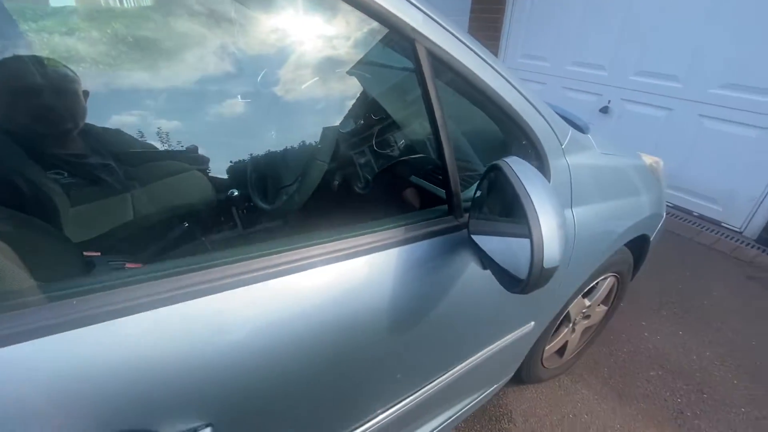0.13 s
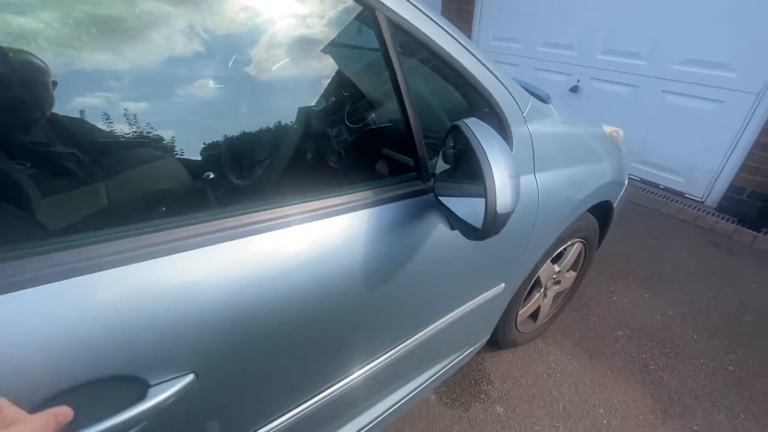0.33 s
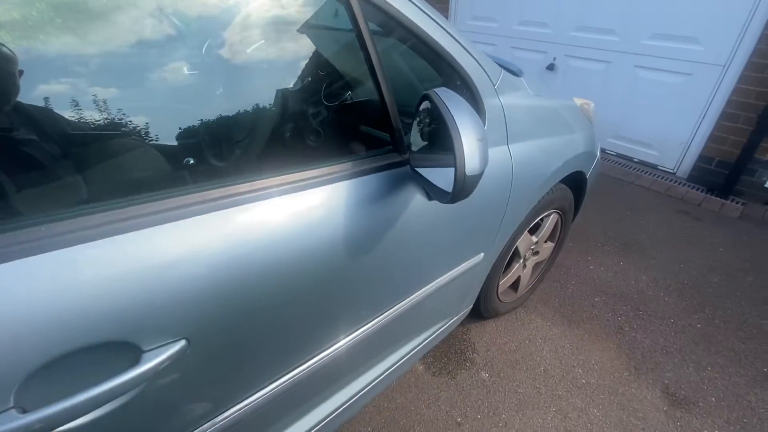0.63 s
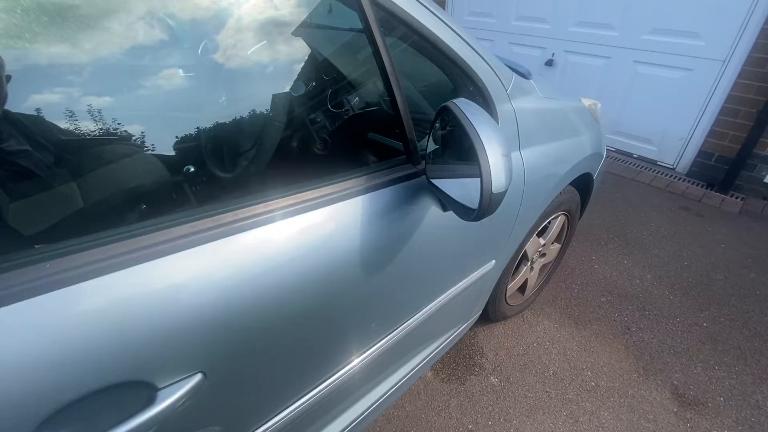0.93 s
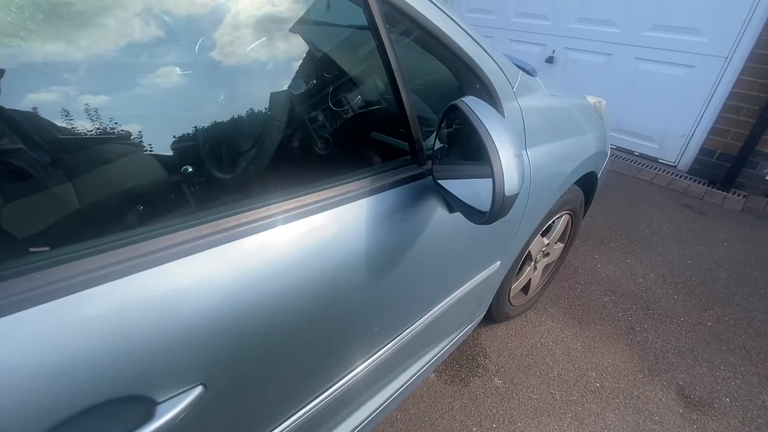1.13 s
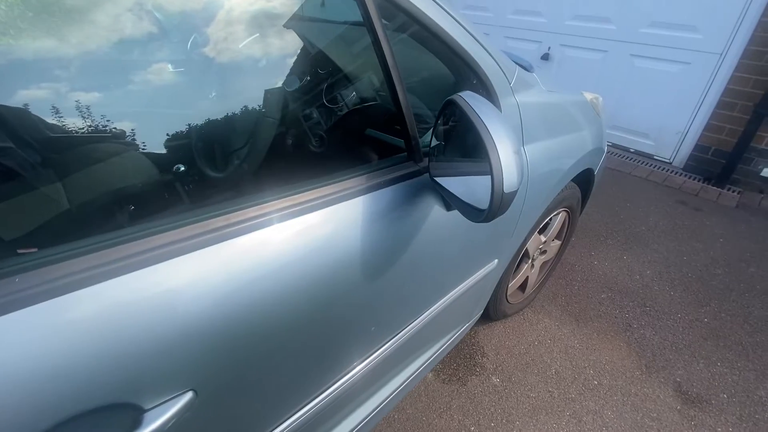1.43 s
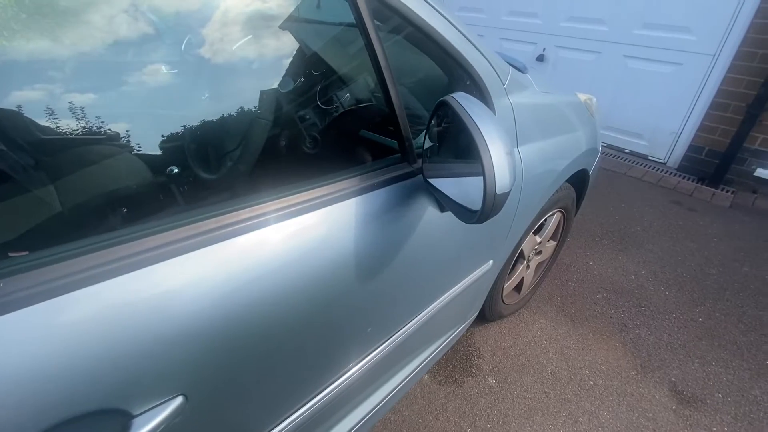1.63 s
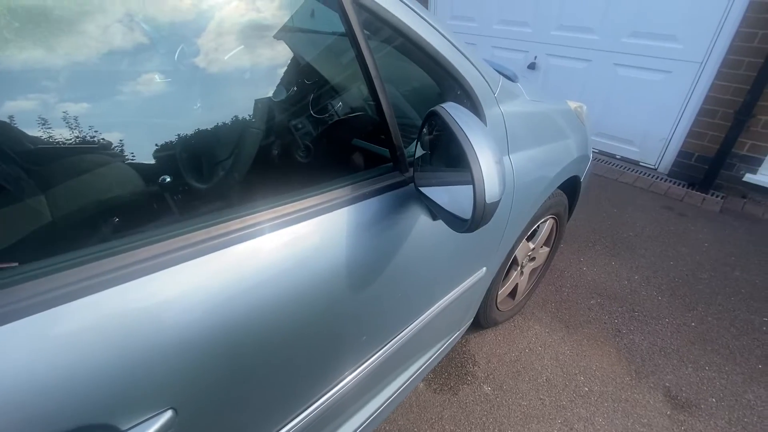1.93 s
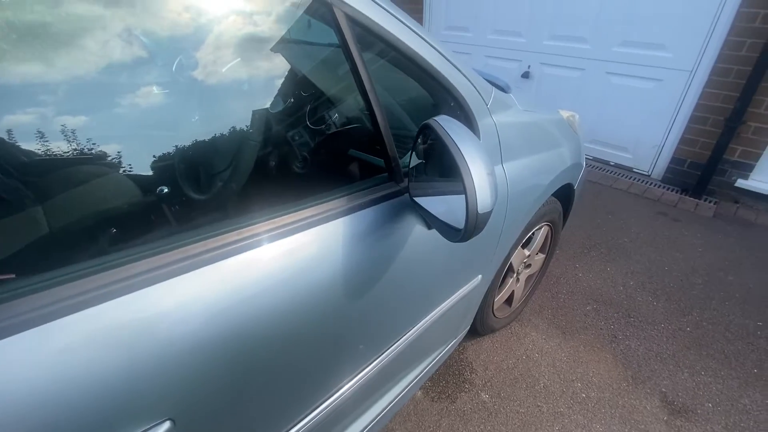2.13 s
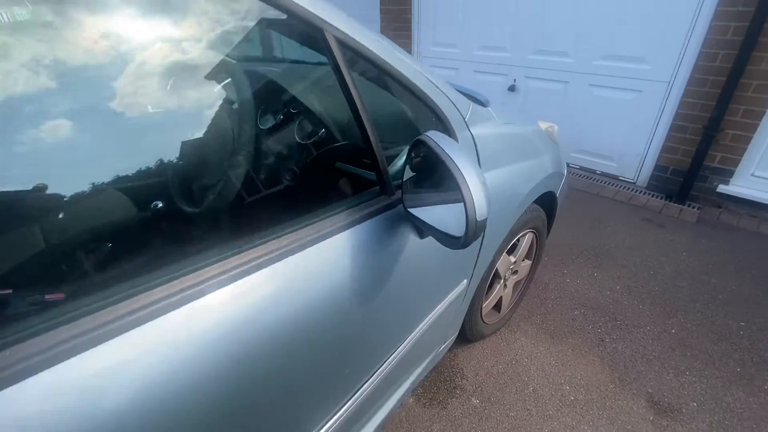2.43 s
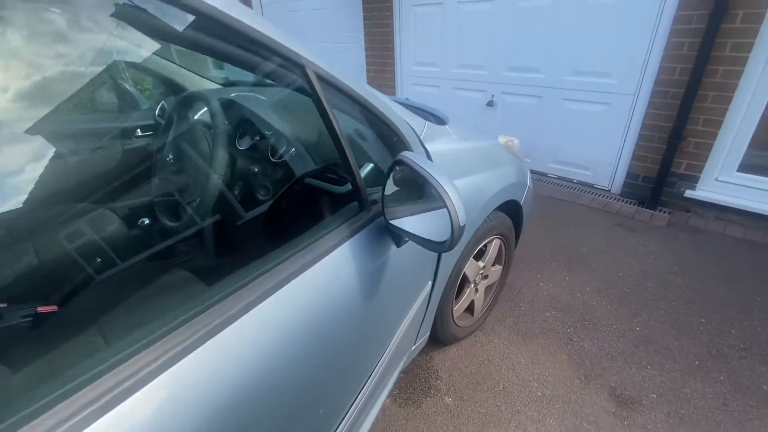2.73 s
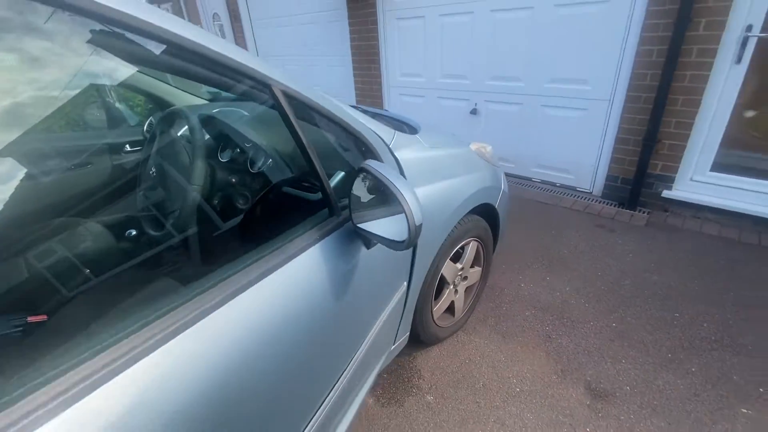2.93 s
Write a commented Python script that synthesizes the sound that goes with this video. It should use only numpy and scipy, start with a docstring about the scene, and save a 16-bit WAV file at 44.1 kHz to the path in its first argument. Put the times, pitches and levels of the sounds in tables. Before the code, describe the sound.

A car door, heard close in stereo outdoors: a sharp lock clunk with a hollow low boom at 0.2 s, then sparse ticks. A softer double knock comes at 1.2 s, faint clicks and a tiny rising squeak around 1.4 s. The latch thuds at 2.2 s, a dry hinge creaks at 2.3-2.5 s, hard clacks follow at 2.6-2.8 s, bright ticks near 3 s. Soft wind buffets and faint traffic underneath.

```python
"""Lock and latch knock a car door on a driveway: bursts of blows excite decaying modes and skin noise.
Booms of band-passed noise follow some knocks, and small parts tick as short, partly resonant noise bursts.
A hand rubs the handle (grit and hiss), a faint tone slides up and a dry hinge creaks by stick-slip pulses.
Wind puffs (low-passed noise) and far traffic (coloured noise) lie under it, all heard by two close ports."""
import sys
import numpy as np
from scipy import signal
from scipy.fft import rfft, irfft, next_fast_len
from scipy.io import wavfile
from scipy.ndimage import uniform_filter1d

SR = 44100
rng = np.random.default_rng(int(sys.argv[2]) if len(sys.argv) > 2 else 0)


def waveform_to_disk(signal):
    """Save audio, clipped to [-1, 1], as 16-bit WAV at the path in sys.argv[1]."""
    frames = np.transpose(np.atleast_2d(signal))
    scaled = np.clip(frames, -1, 1) * 32767
    samples = np.round(scaled).astype(np.int16)
    wavfile.write(sys.argv[1], SR, samples)


def natural_amplitude(level_db):
    """Convert a level in decibels to a linear amplitude factor, elementwise."""
    exponent = np.asarray(level_db, float) / 20
    return 10 ** exponent


N = 136710  # length in samples
TIME_S = np.arange(N) / SR
LEAD = 512  # samples of small blows before the main blow of a knock


def evened(x):
    """Normalisation to unit rms, over all channels together."""
    return x / np.sqrt(np.mean(x ** 2) + 1e-20)


def read(points, hz):
    """Spectral interpolation, linear in log frequency."""
    f, value = np.transpose(points)
    return np.interp(np.log(hz + 1), np.log(f + 1), value)


def along(table, column=1):
    """Linear interpolation of one column over the whole scene's time axis."""
    rows = np.array(table)
    return np.interp(TIME_S, rows[:, 0], rows[:, column])


def add(mix, start_s, sound):
    """Superposition: pressures of separate sounds add."""
    part = mix[:, round(start_s * SR):][:, :sound.shape[1]]
    part += sound[:, :part.shape[1]]


def coloured(x, points, tilt_db=0):
    """Linear filtering by a spectrum in dB, tilted in dB per octave about 1 kHz."""
    hz = np.fft.rfftfreq(x.shape[-1], 1 / SR)
    octaves = np.log2(np.clip(hz, 400, SR) / 1000)  # the tilt stops below 400 Hz
    return irfft(rfft(x) * natural_amplitude(read(points, hz) + tilt_db * octaves), x.shape[-1])


def resonate(x, hz, width_hz):
    """Damped resonance: a pole pair at one pitch, with a peak gain near 1."""
    r = np.exp(-np.pi * width_hz / SR)
    poles = [1, -2 * r * np.cos(2 * np.pi * hz / SR), r * r]
    return signal.lfilter([(1 - r * r) / 2, 0, (r * r - 1) / 2], poles, x)


def grit(size, per_s, spread_db):
    """Random impulse train: sparse clicks of either sign, a few of them large."""
    u, e = rng.random((2, size))
    clicks = np.sign(u - per_s / SR / 2) * (u < per_s / SR)
    return clicks * natural_amplitude(-spread_db * np.log(e.clip(.01)))


def stroke(start_s, length_s, peak_at):
    """Amplitude envelope: a smooth swell that peaks at a share of its length."""
    u = ((TIME_S - start_s) / length_s).clip(0, 1)
    return np.sin(np.pi * u ** (np.log(.5) / np.log(peak_at))) ** 2


def rub():
    """Sliding friction: many tiny impacts over hiss follow the pressure of each stroke."""
    # rubbing strokes of hand and seal: start_s, length_s, level_db
    rub_strokes = [(-.2, 0.97, -56), (0.391, 0.082, -47.5), (2.13, 0.13, -45.5), (2.145, 0.023, -44),
                   (2.435, 0.054, -39.5), (2.492, 0.24, -55.5), (2.97, 0.079, -56)]
    # spectrum of the rubbing: frequency_hz, relative_level_db
    rub_spectrum = [(590, -36), (1000, -0.5), (1810, -5), (2360, -8.5), (3500, -13.5), (7440, -20),
                    (7880, -27), (10200, -18.5), (16000, -34)]
    grit_per_s = 3500
    x = np.array([rng.standard_normal(N) + 1.5 * evened(grit(N, grit_per_s, 3)) for _ in range(2)])
    pressure = sum(natural_amplitude(db) * np.sqrt(stroke(start_s, length_s, 0.55))
                   for start_s, length_s, db in rub_strokes)
    return pressure * evened(coloured(x, rub_spectrum))


def wind():
    """Turbulent pressure: low-passed noise in lumpy puffs, only partly correlated between the ports."""
    # wind puffs on the ports: start_s, length_s, level_db, top_hz
    wind_puffs = [(-.1, 0.29, -48, 124), (0.112, 0.29, -34, 230), (0.4, 0.21, -32.5, 270),
                  (0.584, 0.12, -25.5, 217), (0.697, 0.2, -44, 151), (1.053, 0.19, -46.5, 116.5),
                  (1.149, 0.23, -40, 106), (1.376, 0.15, -31.5, 195.6), (1.48, 0.33, -43.5, 133),
                  (1.655, 0.19, -42, 116), (2.183, 0.22, -30, 69), (2.317, 1, -40, 120)]
    low_hz, calm_db, lumps_db = 55, -60, 3  # low cut; steady air between puffs; rms swing of level
    right_db, same = -4, 0.33  # right port relative to left; correlation of the ports
    hz = np.fft.rfftfreq(N, 1 / SR)
    air = rfft(rng.standard_normal((2, N))) * hz ** 6 / (hz ** 6 + low_hz ** 6)
    puffs = natural_amplitude(calm_db) * evened(irfft(air / (1 + (hz / 80) ** 3), N))
    for start_s, length_s, db, top_hz in wind_puffs:
        puff = evened(irfft(air / (1 + (hz / top_hz) ** 3.13), N))
        puffs = puffs + natural_amplitude(db) * stroke(start_s, length_s, 0.24) * puff
    left, other = puffs
    right = natural_amplitude(right_db) * (same * left + np.sqrt(1 - same ** 2) * other)
    lumps = evened(uniform_filter1d(uniform_filter1d(rng.standard_normal(N), 500), 500))
    return natural_amplitude(lumps_db * lumps) * np.array([left, right])


def traffic():
    """Incoherent sum of far sources: noise with a fixed spectrum and a slowly varying level."""
    # spectrum of far traffic: frequency_hz, relative_density_db
    traffic_spectrum = [(40, -20), (65, -8.5), (200, -14.5), (370, -9), (800, -11.5), (1600, -21.5),
                        (2400, -31), (10000, -46.5), (16000, -61)]
    # level of far traffic: time_s, level_db
    traffic_level = [(0, -54), (.8, -57.5), (1.9, -54.5), (2.7, -50)]
    return natural_amplitude(along(traffic_level)) * evened(coloured(rng.standard_normal((2, N)), traffic_spectrum))


def door_skin(t, tilt_db):
    """Dense modal field: noise that decays at its own rate in each band, slowest in the bass."""
    # spectrum of the door skin before its decay: frequency_hz, relative_density_db
    skin_spectrum = [(100, -29.5), (220, -11), (450, -5), (1000, -9), (2400, -23), (5500, -34.5),
                     (8000, -43.5), (10000, -34), (16000, -50.5)]
    # decay of the door skin: frequency_hz, t60_s
    skin_decay = [(100, 0.51), (260, 0.34), (700, 0.15), (1840, 0.11), (4850, 0.1), (12800, 0.0097)]
    noise = coloured(rng.standard_normal((2, len(t))), skin_spectrum, tilt_db)
    hz, frames_s, z = signal.stft(noise, SR, nperseg=128, noverlap=96)
    rise = np.clip(frames_s * (hz[:, None] + 100) / 3.2, 0, 1)  # the bass builds up more slowly
    crack = 1 + natural_amplitude(2) * np.exp(-frames_s / .003)  # extra level at the onset
    decay = natural_amplitude(-60 * frames_s / read(skin_decay, hz)[:, None])
    return signal.istft(z * rise * crack * decay, SR, nperseg=128, noverlap=96)[1][:, :len(t)]


def door_modes(t, tilt_db):
    """Modal synthesis: a few damped sines, slightly detuned and with random phase on each strand."""
    # distinct door modes: centre_hz (scattered by 3 %), relative_level_db, t60_s (held to 0.2 at most)
    mode_rows = [(475.2, 10, 0.042), (694, -3, 0.11), (1314.6, 5, 0.074), (1800, -6.5, 0.06),
                 (2250, -1, 0.035)]
    strands = np.zeros((2, len(t)))
    for strand in strands:
        for centre_hz, db, t60_s in mode_rows:
            detune, phase = rng.random(2)
            pitch_hz = centre_hz * (.97 + .06 * detune)
            fall = natural_amplitude(db + tilt_db * np.log2(centre_hz / 1000) - 60 * t / min(t60_s, .2))
            strand += fall * np.sin(2 * np.pi * (pitch_hz * t + phase))
    return strands


def knock(db, tilt_db, rattle_s):
    """Impact response: a short rattle of blows is convolved with the ring of the door."""
    t = np.arange(16384) / SR
    modes_db, blows_per_s = -5, 1200
    lead_s, attack_s = 0.0029, 0.0012  # growth before the main blow; rise at flat tilt
    ring = evened(door_skin(t, tilt_db)) + natural_amplitude(modes_db) * evened(door_modes(t, tilt_db))
    ring = ring * (1 - np.exp(-t / attack_s * 2 ** (tilt_db / 2)))  # duller knocks start softer
    after_s = t[:4096] - t[LEAD]
    blows = grit(4096, blows_per_s, 4.38)
    blows = blows * np.exp(-np.maximum(after_s / max(rattle_s, .001), -after_s / lead_s))
    blows[LEAD] = 1.7  # the main blow
    sound = signal.fftconvolve(ring, blows[None], axes=1)
    return natural_amplitude(db) * sound / np.sqrt(np.mean(sound[:, LEAD:LEAD + 1024] ** 2))


def boom(db, hz, fall_s, share):
    """Narrow-band resonance: filtered noise swells over a few cycles, then decays exponentially."""
    t = np.arange(12000) / SR
    noise = rng.standard_normal((2, 2 * len(t)))
    throb = resonate(resonate(noise, hz, share * hz), hz, share * hz)[:, len(t):]  # settled half
    throb = throb / np.std(throb[:, t < 2 * fall_s])
    swell = 1 - np.exp(-t * hz / 1.4)
    return 2 * natural_amplitude(db) * throb * swell * np.exp(-t / fall_s)


def tick(peak_db, hz):
    """Small-part impact: a wide click, a brief resonance at one pitch and a faint quick tail."""
    # spectrum of the click: frequency_hz, relative_level_db
    tick_spectrum = [(900, -20), (2100, -4.5), (5190, -11), (5970, -9), (7270, -20.5), (10800, -9.5),
                     (16000, -24)]
    snap_s, tail_t60_s, ring_db = .0007, 0.046, 1
    t = np.arange(4096) / SR
    envelope = np.exp(-t / snap_s) + 0.27 * natural_amplitude(-60 * t / tail_t60_s)
    burst = rng.standard_normal((2, len(t))) * envelope
    wide = coloured(burst, tick_spectrum) * (t < .08)
    sound = evened(wide) + natural_amplitude(ring_db) * evened(resonate(burst, hz, .18 * hz))
    return natural_amplitude(peak_db) * sound / abs(sound[0]).max()


def squeak():
    """Frequency glide: a faint sine whose phase accumulates a rising pitch."""
    # start_s, length_s, level_db (peak amplitude), from_hz, to_hz
    squeak_glide = (1.415, .06, -54, 1850, 2250)
    start_s, length_s, db, from_hz, to_hz = squeak_glide
    hz = np.interp(TIME_S, [start_s, start_s + length_s], [from_hz, to_hz])
    return natural_amplitude(db) * stroke(start_s, length_s, 0.53) * np.sin(2 * np.pi * np.cumsum(hz) / SR)


def creak():
    """Stick-slip friction: uneven slip pulses and gated scrape excite the resonances of the hinge."""
    # creaking of the hinge: time_s, level_db, slips_per_s
    creak_path = [(2.317, -40, 372), (2.335, -31.5, 362), (2.355, -31, 350), (2.38, -25.5, 356),
                  (2.404, -33, 362), (2.411, -40.5, 382), (2.433, -36.5, 420), (2.445, -24, 350),
                  (2.467, -22.5, 358), (2.494, -30, 372), (2.501, -43.5, 372), (2.53, -39.5, 410)]
    # hinge resonances: centre_hz, width_hz (a second pass is twice as wide), relative_level_db
    hinge_modes = [(365, 188, 0), (668.5, 21, -5.5), (827, 45, 2), (1078, 60, -6.5), (1330, 320, -6.5),
                   (1783, 130, -13)]
    # share of scrape as the swing starts and ends: start_share, end_share
    scrape_share = .2, .45
    slip_jitter, slip_spread_db = .03, 2  # rms share of the slip rate; rms spread of pulse level
    first_s, last_s = creak_path[0][0], creak_path[-1][0]
    on = (TIME_S > first_s) & (TIME_S < last_s)
    wander = evened(uniform_filter1d(rng.standard_normal(N), 200))
    turns = np.cumsum(along(creak_path, column=2) * (1 + slip_jitter * wander)) / SR
    pulses = np.diff(np.floor(turns), prepend=0)  # one slip at each whole turn
    slips = evened(pulses * natural_amplitude(slip_spread_db * rng.standard_normal(N)))
    scrape = evened(rng.standard_normal((2, N)) * (0.18 + np.exp(-(turns % 1) / 0.94)))
    rough = np.interp(TIME_S, [first_s, last_s], scrape_share)
    drive = ((1 - rough) * slips + rough * scrape) * on * natural_amplitude(along(creak_path))
    body = sum(natural_amplitude(db) * resonate(resonate(drive, f, w), f, 2 * w) / np.sqrt(w)
               for f, w, db in hinge_modes)
    return body * np.std(drive) / np.std(body)


def ports(pair):
    """Interaural-style phase and coherence: the left port is phase-shifted, the right partly decorrelated."""
    # phase shift of the left port, negative when it lags: frequency_hz, phase_rad
    left_phase = [(0, 0), (500, 0), (1000, -3.1), (2000, -8.1), (2600, -8.4), (2800, -11), (5600, -12.4),
                  (7200, -10.2), (8700, -12.4), (9300, -11.3), (12000, -15.7), (14000, -18.9),
                  (15500, -21.6)]
    # likeness of the two ports: frequency_hz, correlation
    port_likeness = [(100, 0.88), (1100, 0.85), (4500, 0.26), (11000, 0.76)]
    size = next_fast_len(N + 4096)
    hz = np.fft.rfftfreq(size, 1 / SR)
    first, second = rfft(pair, size)
    same = np.clip(read(port_likeness, hz), 0, 1)
    left = first * np.exp(1j * np.interp(hz, *np.transpose(left_phase)))
    right = same * first + np.sqrt(1 - same ** 2) * second
    return irfft([left, right], size)[:, :N]


def scene():
    """Linear superposition of all sources; the wind acts directly on the ports."""
    # knocks into the door: time_s, level_db, tilt_db_per_octave, rattle_s (decay)
    door_knocks = [(0.16, -42.5, 0, 0.018), (0.2109, -15.5, 3, 0.0066), (1.2121, -34.5, 1.5, 0.011),
                   (1.23, -31, 2.5, 0.017), (1.462, -41, 0.26, 0.035), (2.092, -41.5, -1.5, 0.0242),
                   (2.164, -28, -8, 0.018), (2.1917, -22, 1.5, 0.0058), (2.2305, -34.5, 0.5, 0.003),
                   (2.25, -36.5, 0.5, 0.028), (2.575, -35, -1.5, 0.015), (2.6143, -20, 4, 0.0019),
                   (2.635, -26, 0.5, 0.0043), (2.7765, -29, -3.1, 0.011)]
    # ringing of the struck part or hollow door: start_s, level_db (before swell, fall and doubling),
    # pitch_hz, fall_s, width_share (of the pitch, in each of two passes)
    door_booms = [(.2125, -18.5, 2430, 0.0091, .4), (.236, -21, 172, 0.037, .25),
                  (1.231, -29.5, 327, 0.022, .45), (2.19, -22.5, 129, 0.037, .6),
                  (2.6155, -17.5, 1380, 0.0064, .6), (2.63, -21, 158.3, 0.028, .4),
                  (2.776, -39.5, 1220, 0.017, 0.41), (2.78, -29, 500, 0.022, 0.044)]
    # ticks of small parts: start_s, peak_db, centre_hz
    part_ticks = [(0.614, -39, 3680), (0.6237, -35, 6100), (0.8748, -47, 3200), (1.089, -33.5, 2500),
                  (1.3746, -39, 3120), (1.5938, -32.5, 2960), (1.6574, -32.5, 5480), (2.238, -28.5, 10100),
                  (2.983, -38.5, 5700), (2.9893, -23, 11900), (3.007, -19, 5740), (3.0415, -28.5, 5200)]
    near = rub() + traffic() + squeak() + creak()
    for start_s, *row in door_knocks:
        add(near, start_s - LEAD / SR, knock(*row))  # the main blow falls on time
    for start_s, *row in door_booms:
        add(near, start_s, boom(*row))
    for start_s, *row in part_ticks:
        add(near, start_s, tick(*row))
    return ports(near) + wind()


def low_pass(x):
    """Removes everything above the highest recorded frequency."""
    return signal.sosfilt(signal.butter(12, 16670, fs=SR, output="sos"), x)


def record(dry):
    """Transmission chain: the finished mix passes through one last stage."""
    return low_pass(dry)


dry = scene()
out = record(dry)
waveform_to_disk(out)
```